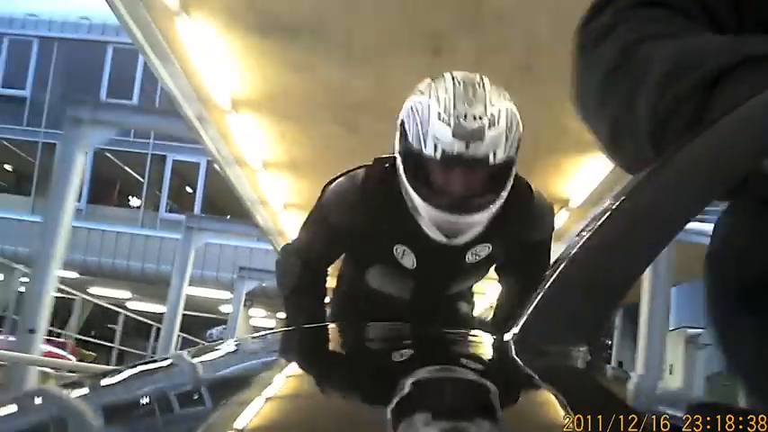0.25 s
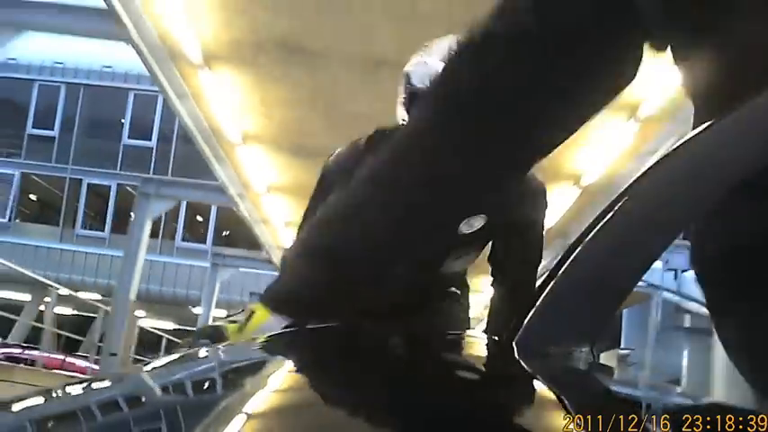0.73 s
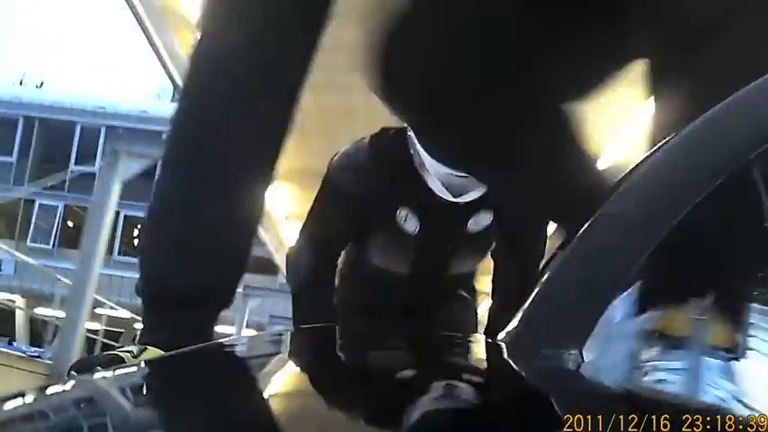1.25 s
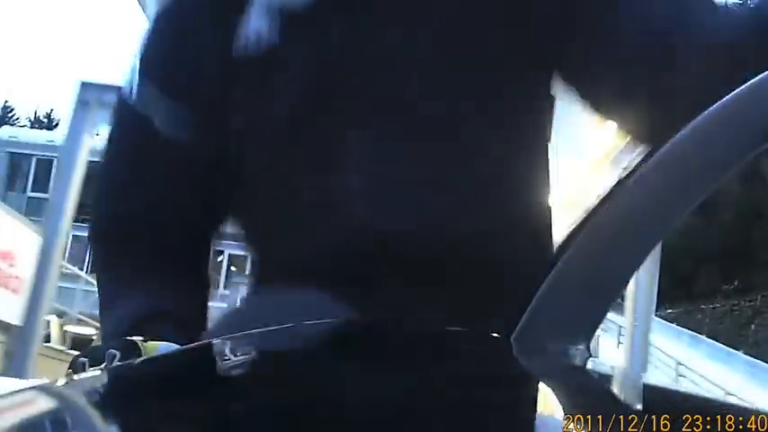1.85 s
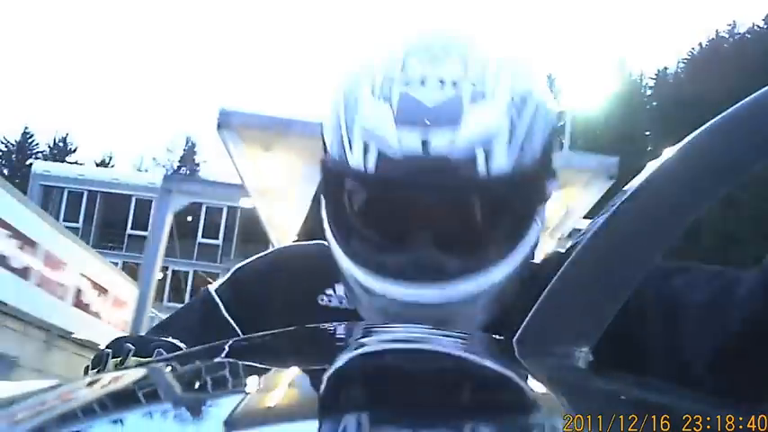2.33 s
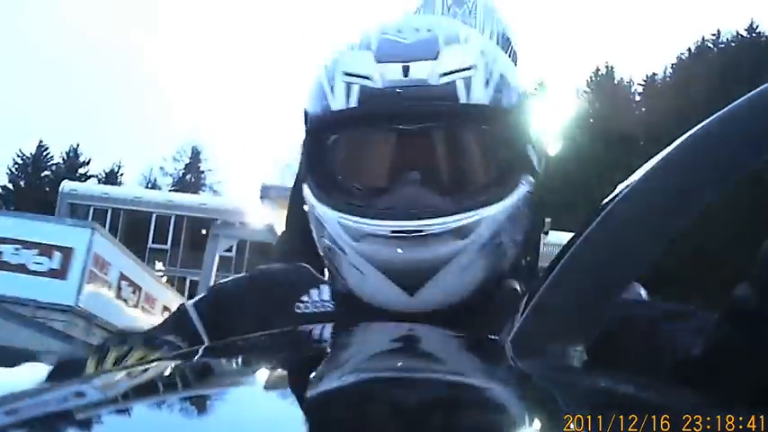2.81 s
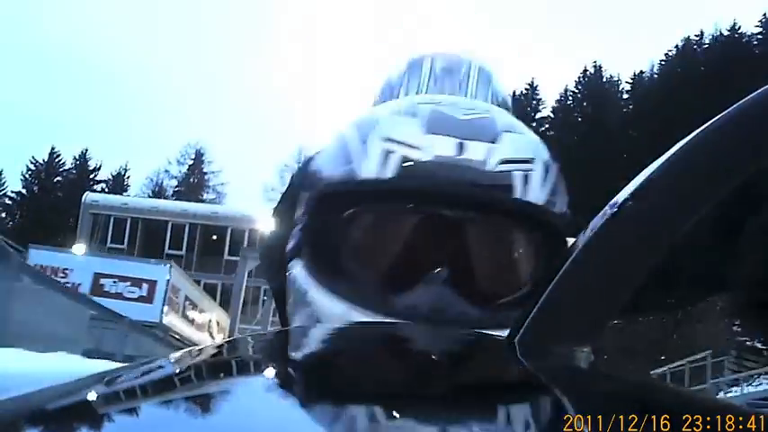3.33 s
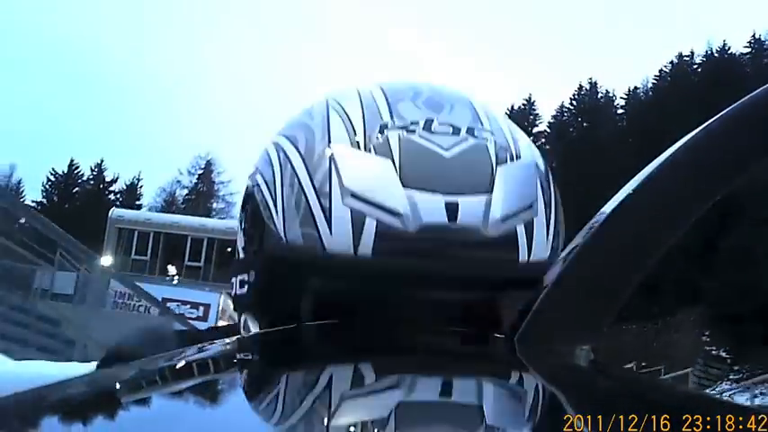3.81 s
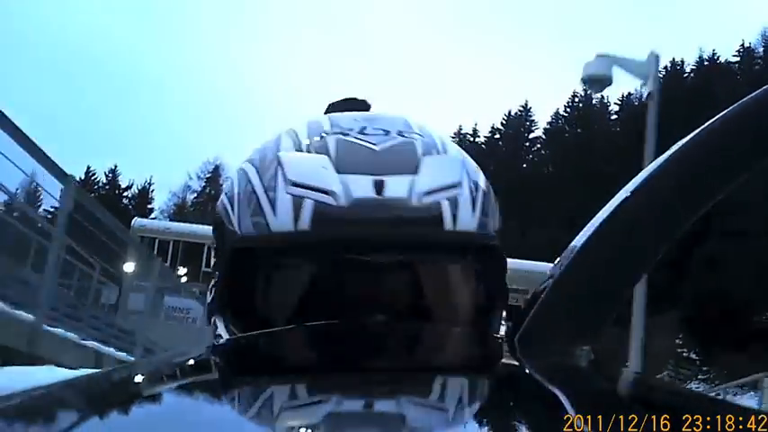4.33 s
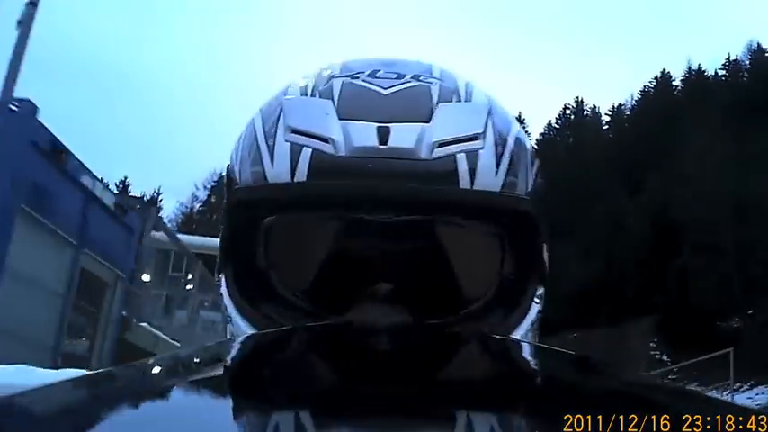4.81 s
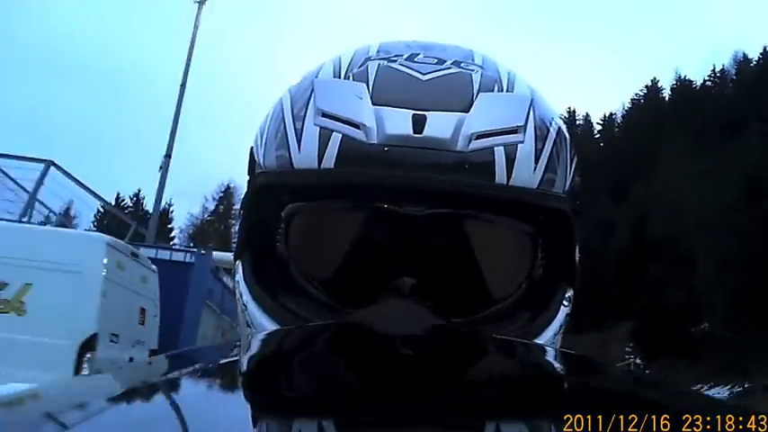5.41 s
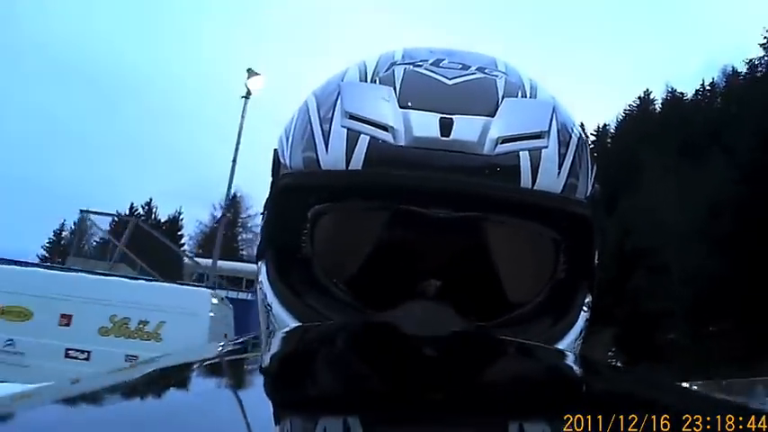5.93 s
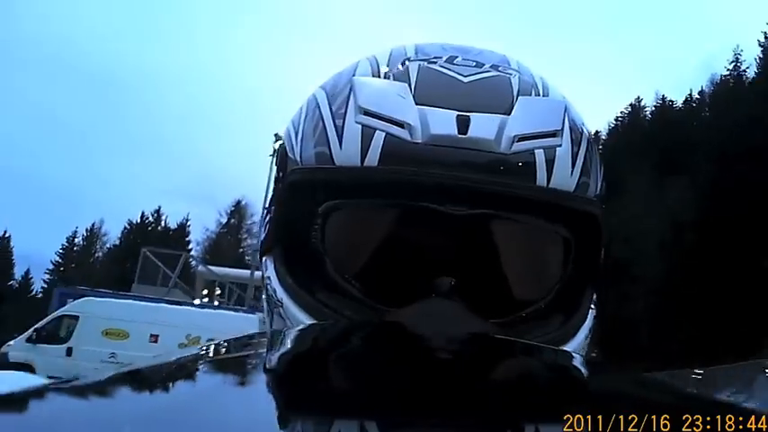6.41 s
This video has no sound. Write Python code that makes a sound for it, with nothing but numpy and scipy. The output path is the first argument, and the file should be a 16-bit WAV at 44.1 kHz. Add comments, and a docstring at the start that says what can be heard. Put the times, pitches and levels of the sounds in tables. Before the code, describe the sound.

Close on a bobsleigh, the runners grind softly on ice over a low frame rumble. Jolts swell, light knocks and a faint metallic clink follow. From two to three seconds the crew drop in with thuds and very loud, hollow, rattling bangs that overload the small attached microphone. The uneven scrape and rumble continue, with small squeaks and one tight cluster of knocks near 4.7 seconds.

```python
"""A bobsleigh on an ice track, heard by a small camera fixed to its cowling.
From the start the runners grind (filtered impact noise) and the frame rumbles (low noise); jolts soon swell both.
Knocks then ring the housing (decaying modes), suits and gloves scuff (band-passed slips), a steel fitting clinks.
From about 2 s, and again near 4.7 s, the crew drop into their seats: the frame thuds, and the housing knocks
and rattles hard enough to overload the microphone."""
import sys
import numpy as np
from scipy import signal
from scipy.fft import rfft, irfft
from scipy.io import wavfile
from scipy.ndimage import uniform_filter1d

SR = 44100
rng = np.random.default_rng(int(sys.argv[2]) if len(sys.argv) > 2 else 0)


def wav_record(signal):
    """Record a signal, one row per channel, as 16-bit PCM in the file named by sys.argv[1]."""
    frames = np.transpose(np.atleast_2d(signal))
    bounded = np.clip(frames, -1, 1)
    # unit amplitude maps onto the largest positive 16-bit level
    quanta = np.round(bounded * 32767).astype(np.int16)
    wavfile.write(sys.argv[1], SR, quanta)


N = 293706
T = np.arange(N) / SR  # s
FREQ = np.maximum(np.arange(N // 2 + 1) * SR / N, 1)  # Hz


def undb(db):
    """Decibels are logarithmic: 20 dB is a tenfold amplitude."""
    return 10 ** (np.asarray(db) / 20)


def unit(x):
    """Normalisation by effective value: the rms becomes one."""
    return x / np.sqrt(np.mean(x ** 2))


def colour(points):
    """Spectral envelope: gain at every frequency, interpolated in dB over log frequency."""
    hz, db = np.transpose(points)
    return undb(np.interp(np.log(FREQ), np.log(hz), db))


def shaped(x, gain):
    """Linear filtering: the spectrum is multiplied by a gain, then scaled to an rms of one."""
    return unit(irfft(rfft(x) * gain, N))


def walk(rate):
    """Slow random modulation: chance values, `rate` per second, joined smoothly; rms one."""
    hold = max(int(SR / rate), 2)
    steps = np.repeat(rng.standard_normal(N // hold + 1), hold)
    return unit(uniform_filter1d(steps, hold)[:N])


def contacts(per_s, spread_db):
    """Shot noise: a random stream of tiny impacts of uneven size."""
    struck = rng.random(N) < per_s / SR
    sizes = rng.standard_normal(N) * undb(spread_db * rng.standard_normal(N))
    return unit(struck * sizes)


def swell(s, length, lean=0.22):
    """Gaussian envelope, building a little faster than it lets go: its samples and their gains."""
    near = slice(max(int((s - 2 * length) * SR), 0), int((s + 3 * length) * SR))
    lag = T[near] - s
    leaning_length = length * (1 + lean * np.sign(lag))
    return near, np.exp(-2 * (lag / leaning_length) ** 2)


def ringing(hz, t60, t):
    """Damped modes: one sine per row, falling by 60 dB in its t60."""
    fade = np.exp(-np.log(1000) * np.outer(1 / t60, t))
    return np.sin(2 * np.pi * np.outer(hz, t)) * fade


# broad spectrum of the scraping: (frequency [Hz], relative level [dB])
SCRAPE_SPECTRUM = [(100, -7.5), (250, -2), (400, -5.5), (540, -8), (700, 2), (1000, 1), (1500, -4),
                   (2000, -3.5), (2350, -13), (3050, -16), (3600, -25.5), (5000, -39), (7500, -32),
                   (15000, -63)]
# resonances of the hull: (frequency [Hz], width [Hz], lift [dB])
HULL_RESONANCES = [(705, 76, 7), (851, 59, 8.5), (1386, 67, 4.5), (1650, 350, 3), (1948, 176, 5),
                   (2560, 60, -4), (2860, 41, 6)]


def hull_response():
    """Resonance: the hull's modes raise or lower narrow bands of the broad scraping spectrum."""
    lift = sum(db / (1 + (2 * (FREQ - hz) / width) ** 2) for hz, width, db in HULL_RESONANCES)
    return colour(SCRAPE_SPECTRUM) * undb(lift)


# hardest jolts of the runners: (middle [s], relative level [dB], spectral tilt [dB per octave])
RUNNER_JOLTS = [(0.257, -41.5, -3), (0.379, -44.5, 1.5), (0.607, -32.5, -3), (.697, -39.5, -5.5),
                (0.888, -33.5, -0.5), (.95, -38.5, -4.5), (1.027, -36.5, -5), (1.185, -35.5, -3),
                (1.461, -37.5, 5.5), (1.566, -35, 5), (1.61, -35, -5), (1.835, -35, -1.5),
                (2.252, -37.5, 2), (2.357, -36.5, 3), (2.79, -35, 7), (3.225, -33.5, 3.5), (3.29, -38, 0.5),
                (3.42, -39.5, -3), (3.509, -36, 1), (3.623, -37.5, 2), (3.709, -39.5, -1), (3.937, -31, 0),
                (3.997, -33.5, -2.5), (4.057, -38, -7), (4.115, -36, 0.5), (4.165, -33, 2),
                (4.279, -32, -5.5), (4.375, -35.5, 8), (4.479, -37.5, -1.5), (4.87, -34.5, -1.5),
                (4.953, -38, 2.5), (5.061, -36, 3.5), (5.11, -37.5, 0.5), (5.168, -36, -1.5),
                (5.284, -33, -0.5), (5.42, -29, -5), (5.459, -35, 1.5), (5.543, -35.5, 0.5),
                (5.62, -39, -0.5), (5.948, -35.5, -3), (6.114, -34.5, 3.5), (6.163, -35.5, -2.5),
                (6.224, -34, -6), (6.329, -38, -1), (6.376, -34, -4.5), (6.423, -33, -3.5),
                (6.504, -34.5, -1)]
JOLT_S = 0.026  # nominal half length
BUMPS_PER_S, BUMPS_DB = 28, 1.0  # small bumps in the ice make the scraping come and go
# the tilt acts about a pivot, grows up to the bite, then fades to nothing at the end
PIVOT_HZ, BITE_HZ, BITE_END_HZ = 1200, 2830, 4800


def runners(glide_db, steady_db=1.5, jolt_db=0.77, judder_db=2.5):
    """Friction as shot noise: runners grind on ice; jolts press them down and tilt the spectrum."""
    hull = hull_response()
    grit = contacts(per_s=5000, spread_db=2)
    grit = grit * undb(judder_db * walk(70) + BUMPS_DB * walk(BUMPS_PER_S))
    out = shaped(grit, hull) * undb(glide_db + steady_db)

    octaves = np.log2(np.clip(FREQ, PIVOT_HZ / 2, BITE_HZ) / PIVOT_HZ)
    octaves = octaves * np.interp(FREQ, [BITE_HZ, BITE_END_HZ], [1, 0])
    jolt_grit = contacts(per_s=4500, spread_db=1.5)
    tilts = np.linspace(-12, 12, 5)  # dB per octave
    pressure = np.zeros((len(tilts), N))
    for s, db, tilt in RUNNER_JOLTS:
        near, push = swell(s, JOLT_S)
        # a jolt blends the two nearest shades of brightness
        shares = np.maximum(1 - abs(tilts - tilt) / (tilts[1] - tilts[0]), 0)
        pressure[:, near] += np.outer(shares, undb(db) * push)
    for tilt, push in zip(tilts, pressure):
        out += undb(jolt_db) * push * shaped(jolt_grit, hull * undb(tilt * octaves))
    return out


def patchy(x, patchy_db=1.9):
    """Bandwise modulation: as the contact point wanders along the runner, each band flickers alone."""
    spectrum = rfft(x)
    octaves = np.log2(np.clip(FREQ, 700, 2800) / 700)
    out = np.zeros(N)
    for centre in np.arange(5) / 2:  # overlapping bands half an octave apart
        band = np.maximum(1 - 2 * abs(octaves - centre), 0)
        out += irfft(spectrum * band, N) * unit(undb(patchy_db * walk(35)))
    return out


# spectrum of the frame's rumble: (frequency [Hz], relative level [dB])
RUMBLE_SPECTRUM = [(20, -4), (45, -5.5), (88, 1.5), (125, -4), (155, -2.5), (190, -6.5), (260, -6),
                   (330, -11.5), (420, -19), (600, -22.5), (1500, -52)]
# the crew's weight thuds into the frame: (time [s], level [dB])
CREW_THUDS = [(2.055, -27), (2.546, -25), (2.883, -26.5), (4.69, -32)]
THUD_DECAY_S = 0.034
SHAKE_DB, SHAKE_S = -3.5, 0.029  # shake against the jolt's level; nominal half length


def frame(rumble_db, gain_db=0.56, lumpy_db=1.4):
    """Addition of powers: the frame's lumpy rumble, every jolt and the crew's weight sum as energy."""
    power = undb(rumble_db + gain_db) ** 2
    for s, db, _ in RUNNER_JOLTS:
        near, push = swell(s, SHAKE_S)
        power[near] += (undb(db + SHAKE_DB) * push) ** 2
    for s, db in CREW_THUDS:
        i = int(s * SR)
        power[i:i + SR] += (undb(db) * np.exp(-T[:SR] / THUD_DECAY_S)) ** 2
    lumps = undb(lumpy_db * walk(25))
    rumble = shaped(rng.standard_normal(N) * lumps, colour(RUMBLE_SPECTRUM))
    return rumble * np.sqrt(power)


HOP_LEAD_S, HOP_S, HOP_DB = 0.047, 0.023, -1  # lead on the jolt, nominal half length, change of level


def hops():
    """Unloading of the contact: the scraping dips, in dB, as the sled rides light ahead of a jolt."""
    out = np.zeros(N)
    for s, *_ in RUNNER_JOLTS:
        near, lift = swell(s - HOP_LEAD_S, HOP_S)
        out[near] += HOP_DB * lift
    return out


# blows on the housing, relative levels:
# (time [s], blow [dB], pitch excited most [Hz], chatter [dB], sizzle [dB])
HOUSING_KNOCKS = [(.586, -31, 1490, -41, -63), (.876, -24.5, 1020, -32, -65),
                  (1.4392, -22.5, 1170, -29, -64), (1.817, -28, 800, -38, -68),
                  (1.947, -26, 1190, -31.5, -52), (2.0527, -15, 1130, -23.5, -68),
                  (2.0645, -12, 1490, -19.5, -60), (2.4275, -10, 2030, -16.5, -32.5),
                  (2.4336, -8, 1940, -18.5, -37), (2.4619, -24, 1730, -16.5, -33.5),
                  (2.483, 1.5, 1660, -19, -42), (2.546, 19, 1910, -11.5, -24), (2.5606, 7, 1930, -34, -56),
                  (2.676, -20, 1920, -39, -50), (2.8809, -9, 1100, -22, -34.5), (2.8827, 3, 1950, -29, -39),
                  (2.9208, -38, 1880, -29.5, -39.5), (2.9773, 0, 1200, -28, -37),
                  (2.9866, -8.5, 1600, -17.5, -23), (2.9954, -5, 840, -16.5, -58),
                  (3.616, -22, 1500, -33, -66), (4.675, -29, 1560, -19, -40), (4.6825, -10, 1380, -18, -37),
                  (4.6878, -7.5, 1280, -17, -38), (4.6963, -6.5, 1350, -25, -55)]
# modes of the housing before detuning: (frequency [Hz], relative level [dB], t60 [s])
HOUSING_MODES = [(59, -20, 0.1), (262, -13.5, 0.024), (376, -9.5, 0.028), (473, -14.5, 0.043),
                 (778, -9, 0.069), (1032, -4.5, 0.034), (1259, -2, 0.023), (1410, -8.5, 0.027),
                 (1587, -7, 0.034), (1863, 1.5, 0.022), (1996, -8.5, 0.027), (2130, -41, 0.0077),
                 (2734, -11.5, 0.015), (3054, -9.5, 0.018), (3810, -21.5, .016), (8100, -34, 0.02)]
# spectrum of the sizzle at the joints: (frequency [Hz], relative level [dB])
SIZZLE_SPECTRUM = [(1500, 0), (3000, 12), (4500, 5.5), (6300, 0), (7500, 13.5), (9000, -0.5), (13000, 2.5),
                   (16000, -14)]
CHATTER_DECAY_S = 0.015


def housing(focus_db=10, blow_db=-0.5, chatter_db=-1.0, rise_s=0.00073, sizzle_decay_s=0.0079,
            detune=0.024, uneven_db=2.1):
    """Modal excitation: blows ring the housing; its loose parts chatter on and sizzle at the joints."""
    size = SR // 4
    t, out = T[:size], np.zeros(N + size)
    hz, db, t60 = np.transpose(HOUSING_MODES)
    sizzle = shaped(contacts(per_s=3500, spread_db=1.0), colour(SIZZLE_SPECTRUM))
    rise = 1 - np.exp(-t / rise_s)
    sizzle_fade = np.exp(-t / sizzle_decay_s) * rise
    for s, hit_db, pitch, rattle_db, fizz_db in HOUSING_KNOCKS:
        i = int(s * SR)
        # the hardness of the contact and the spot it lands on pick which modes answer
        off_pitch = np.minimum(2 * np.log2(hz / pitch) ** 2, 1)
        weight = undb(db - focus_db * off_pitch + uneven_db * rng.standard_normal(len(hz)))
        detuned = hz * (1 + detune * rng.standard_normal(len(hz)))
        ring = weight @ ringing(detuned, t60, t) / np.linalg.norm(weight) * rise
        taps = rng.standard_normal(size) * np.exp(-t / CHATTER_DECAY_S)
        chatter = signal.fftconvolve(taps, ring / np.linalg.norm(ring))[:size]
        out[i:i + size] += undb(hit_db + blow_db) * ring
        out[i:i + size] += undb(rattle_db + chatter_db) * chatter
        out[i:i + size] += undb(fizz_db) * sizzle[i:i + size] * sizzle_fade
    return out[:N]


# scuffs and squeaks of suits and gloves on the cowling: (middle [s], relative level [dB], pitch [Hz])
CLOTHING_SCUFFS = [(.886, -56, 2800), (1.462, -58, 8000), (1.525, -59, 7700), (1.57, -57, 7700),
                   (1.893, -55.5, 7250), (2.107, -57.5, 7800), (2.15, -44.5, 2400), (2.264, -58, 8300),
                   (2.778, -46, 2630), (3.215, -47, 2580), (3.281, -49, 2600), (4.27, -57, 6700),
                   (4.314, -49, 2700), (4.375, -47, 2690), (4.53, -53, 2700), (4.947, -44.5, 2540),
                   (5.054, -46.5, 2800), (5.459, -46.5, 2640), (5.626, -50.5, 2700), (6.119, -56.5, 13000),
                   (6.517, -59.5, 7560)]
SCUFF_S = 0.011  # nominal half length
# width as a share of the pitch, for a low squeak; higher rubs are broader, up to the widest share
SQUEAK_HZ, SCUFF_WIDTH, WIDEST = 2700, 0.17, 0.6


def scuffs(gain_db=4.5):
    """Stick-slip friction: tiny slips through one resonance, narrow for a squeak, broad for a swish."""
    out, slips = np.zeros(N), contacts(per_s=2600, spread_db=2.5)
    for s, db, hz in CLOTHING_SCUFFS:
        near, push = swell(s, SCUFF_S)
        width = min(SCUFF_WIDTH * hz / SQUEAK_HZ, WIDEST)
        edges_hz = hz * np.exp(np.array([-width, width]) / 2)
        band = signal.butter(2, edges_hz, "bandpass", fs=SR, output="sos")
        out[near] += undb(db + gain_db) * push * unit(signal.sosfilt(band, slips[near]))
    return out


# taps on a steel fitting: (time [s], relative level [dB])
FITTING_TAPS = [(1.4403, -33.5), (1.947, -22.5)]
# modes of the fitting: (frequency [Hz], relative level [dB], t60 [s])
FITTING_MODES = [(2826, -2.5, 0.035), (3005, 0.5, 0.029), (3320, -13, 0.022), (4780, -24, .025),
                 (5500, -23, .02), (7300, -16, 0.024)]


def clinks(touch_s=0.00054, buzz_db=-26, buzz_decay_s=0.0097):
    """Impulse response: a tapped steel fitting rings briefly and buzzes against its seat."""
    out, t = np.zeros(N), T[:SR // 4]
    hz, db, t60 = np.transpose(FITTING_MODES)
    ring = undb(db) @ ringing(hz, t60, t) * (1 - np.exp(-t / touch_s))
    for s, hit_db in FITTING_TAPS:
        i = int(s * SR)
        taps = undb(buzz_db) * rng.standard_normal(len(t)) * np.exp(-t / buzz_decay_s)
        buzz = signal.fftconvolve(taps, ring)[:len(t)]
        out[i:i + len(t)] += undb(hit_db) * (ring + buzz)
    return out


# the glide between jolts, relative levels:
# (time [s], steady scraping of the runners [dB], rumble of the frame [dB])
GLIDE_LEVELS = [(0, -52, -45), (.48, -55, -48), (.56, -44.5, -43.5), (.82, -52, -47), (1.3, -42.5, -39.5),
                (1.72, -46, -43), (2.2, -42.5, -39), (2.8, -43.5, -40.5), (3.35, -46, -41.5),
                (3.52, -43.5, -38), (3.85, -50, -43.5), (4.12, -40.5, -39), (4.8, -40.5, -38.5),
                (5, -45.5, -41.5), (5.5, -47, -40), (5.86, -47, -47), (6.08, -46.5, -38.5), (6.3, -48, -41),
                (6.66, -39, -37.5)]


def scene():
    """Superposition: all the sounds, carried to the microphone through the sled, add linearly."""
    s, *levels = np.transpose(GLIDE_LEVELS)
    glide_db, rumble_db = (np.interp(T, s, db) for db in levels)
    scraping = patchy(runners(glide_db + hops()))
    mix = scraping + frame(rumble_db) + housing() + scuffs() + clinks()
    return mix[None]  # one channel


# spectrum of the camera's own hiss: (frequency [Hz], relative level [dB])
HISS_SPECTRUM = [(1000, -2), (4000, 6), (6300, 0), (7600, 2), (10000, -0.5), (13000, -2.5), (15000, -10),
                 (16000, -19)]
TOP_HZ = 15600  # upper limit of the camera's band


def record(dry, hiss_db=-63.5, ceiling=0.72, knee=8, soft_hz=9000):
    """Saturation and band limiting: the camera flattens hard knocks, dulls, hisses and cuts the top."""
    clipped = dry / (1 + abs(dry / ceiling) ** knee) ** (1 / knee)
    softened = signal.sosfilt(signal.butter(1, soft_hz, fs=SR, output="sos"), clipped)
    hiss = undb(hiss_db) * shaped(rng.standard_normal(N), colour(HISS_SPECTRUM))
    top_cut = signal.ellip(8, 0.2, 70, TOP_HZ, fs=SR, output="sos")
    return signal.sosfilt(top_cut, softened + hiss)


dry = scene()
out = record(dry)
wav_record(out)
```